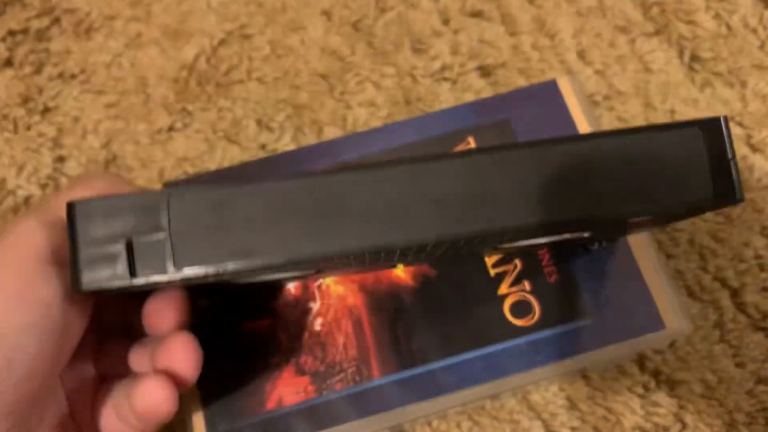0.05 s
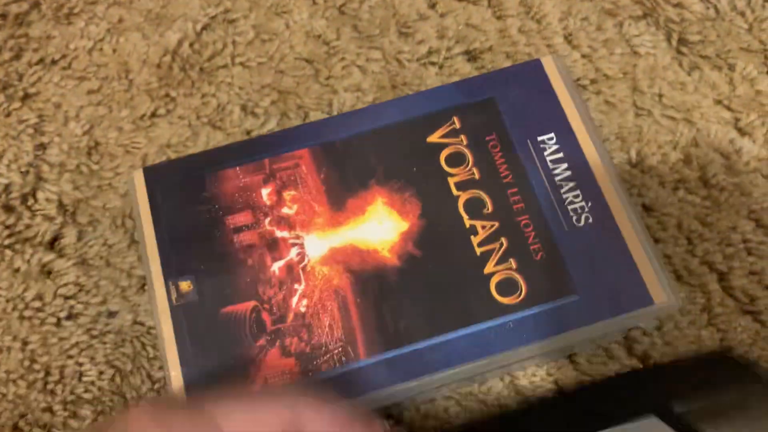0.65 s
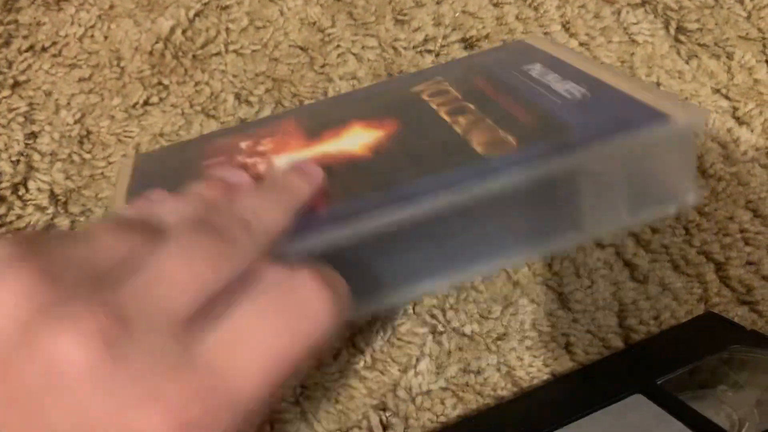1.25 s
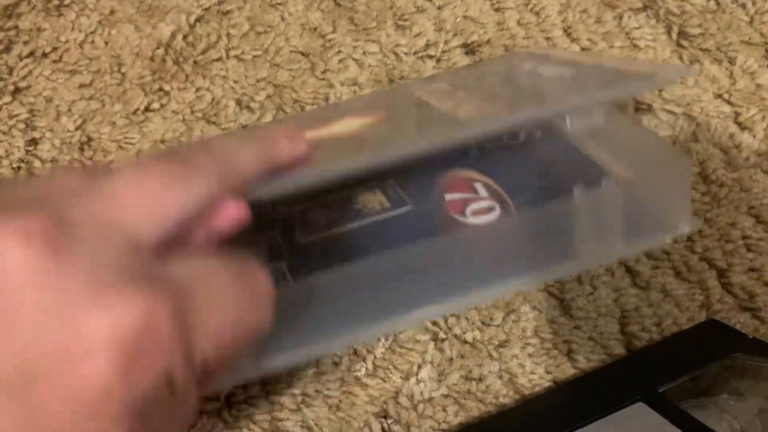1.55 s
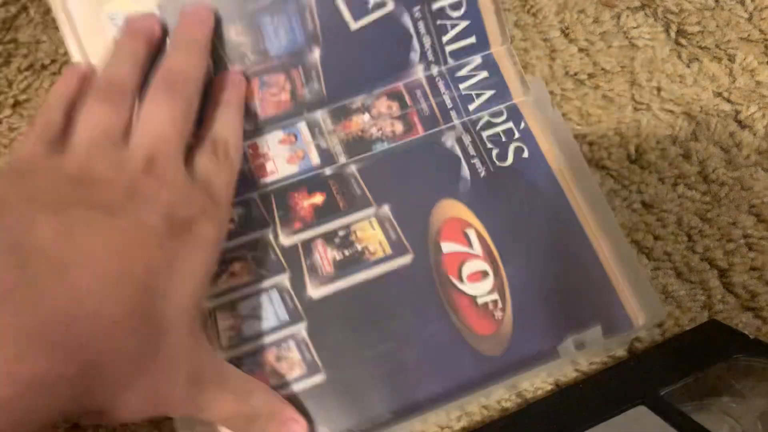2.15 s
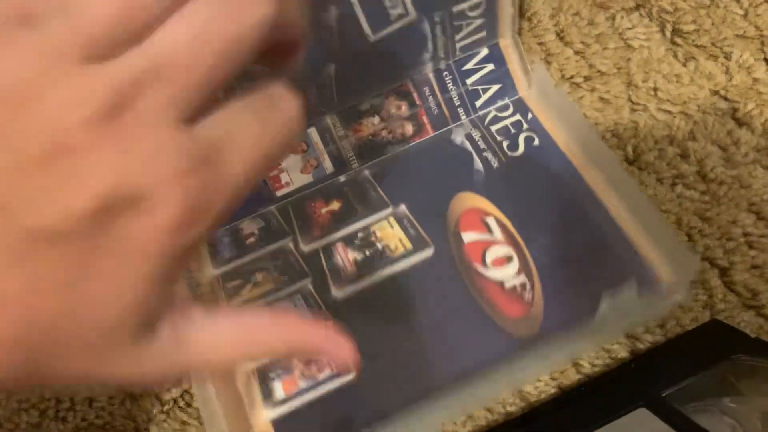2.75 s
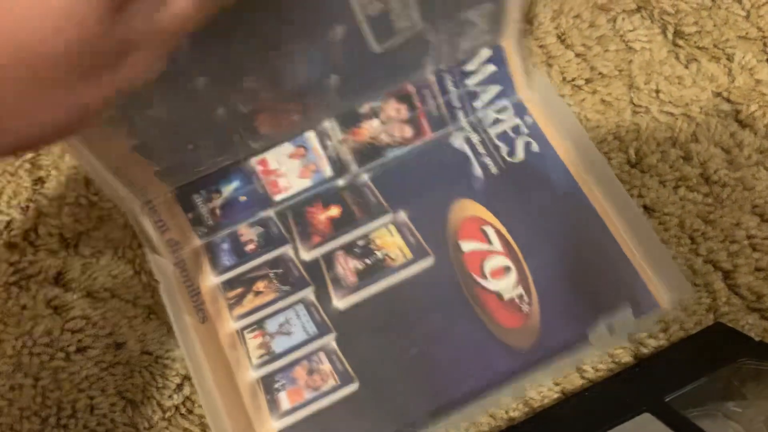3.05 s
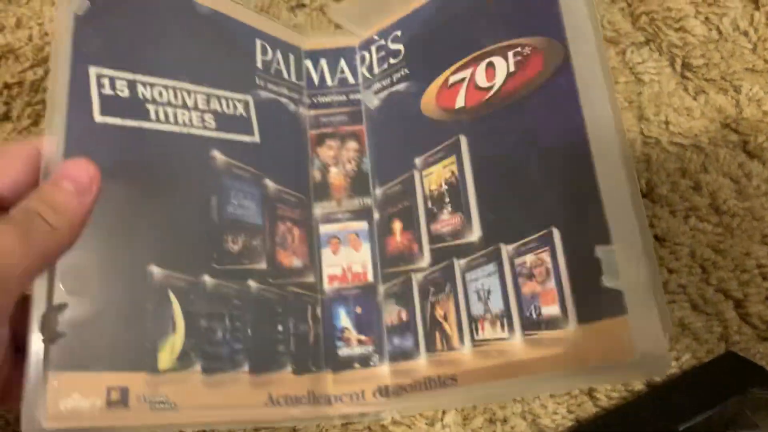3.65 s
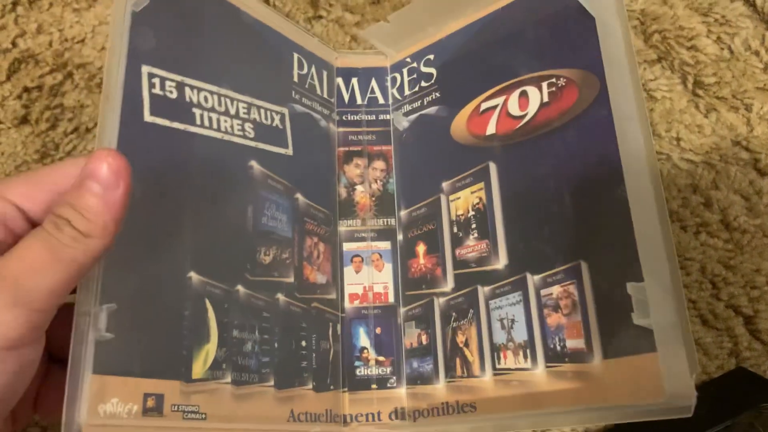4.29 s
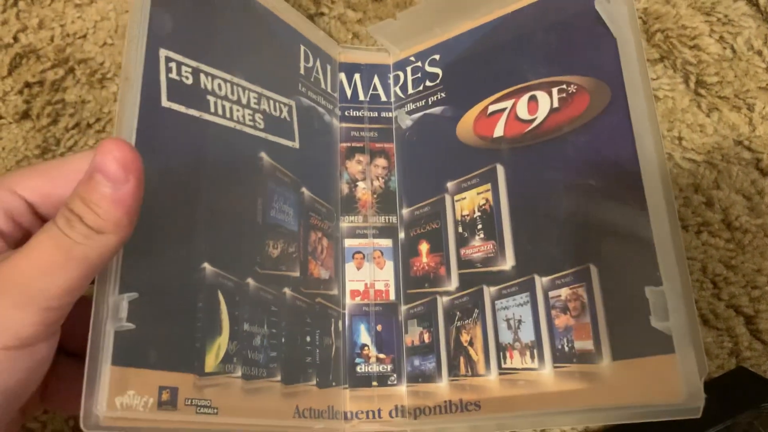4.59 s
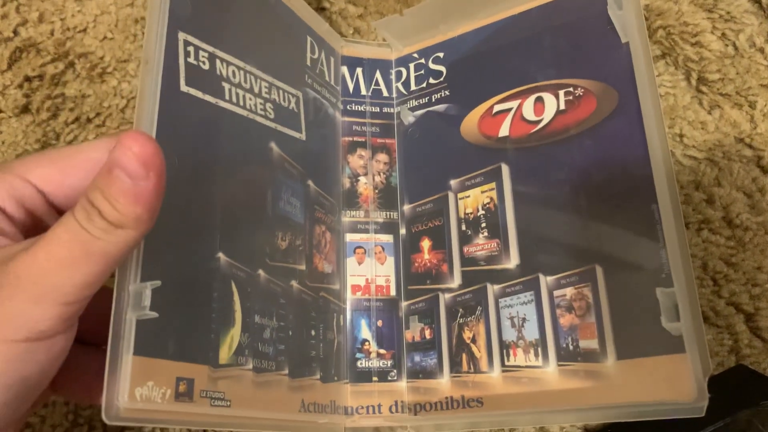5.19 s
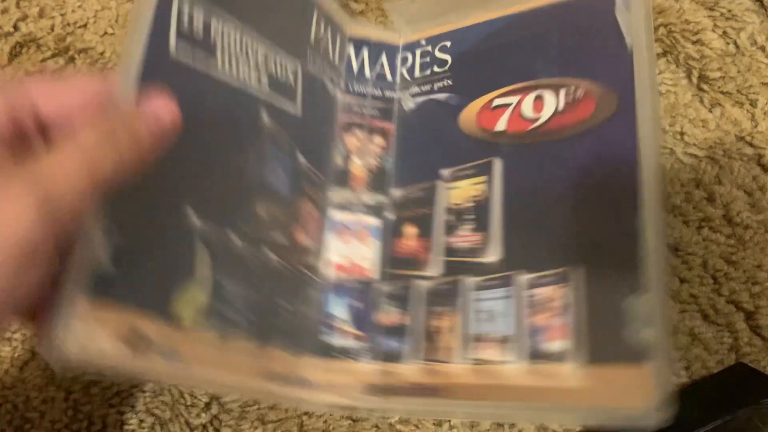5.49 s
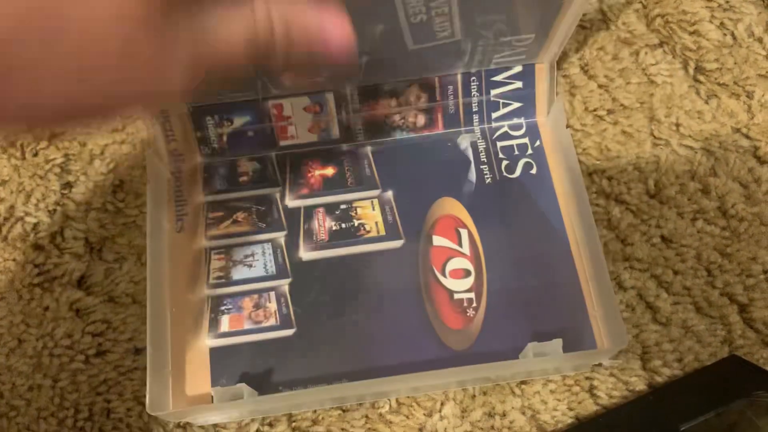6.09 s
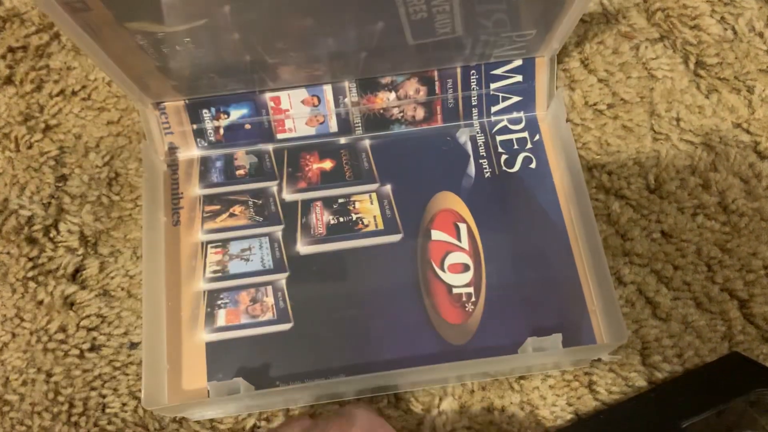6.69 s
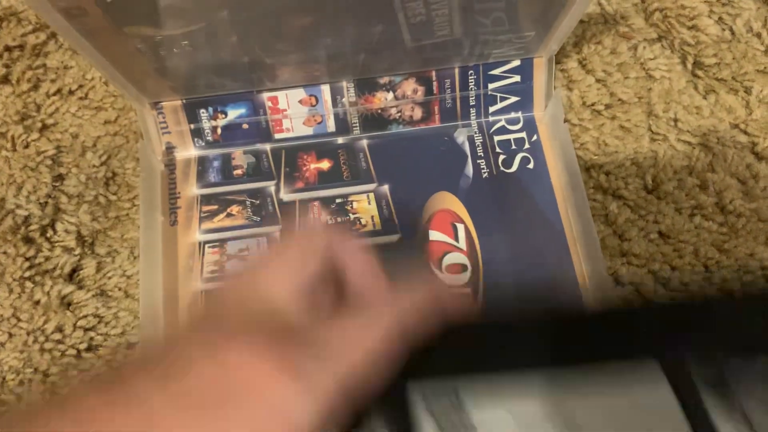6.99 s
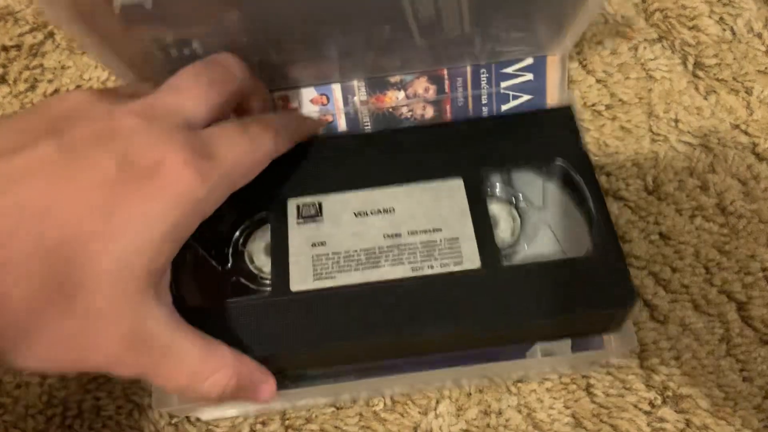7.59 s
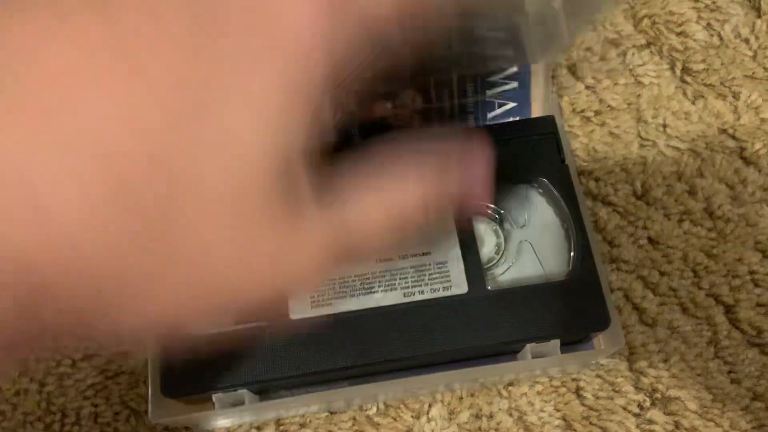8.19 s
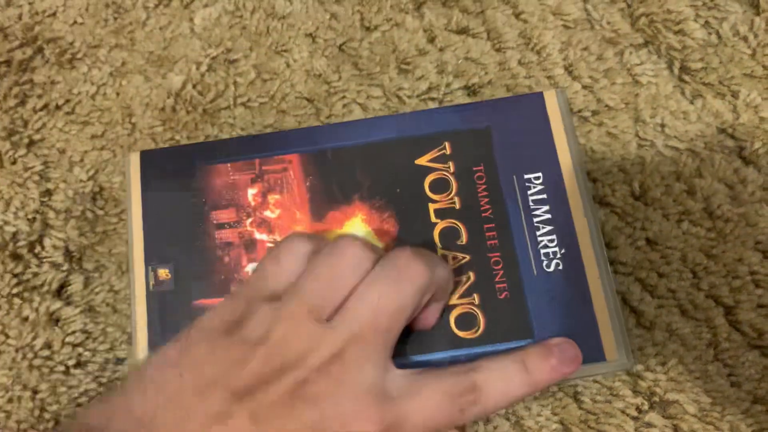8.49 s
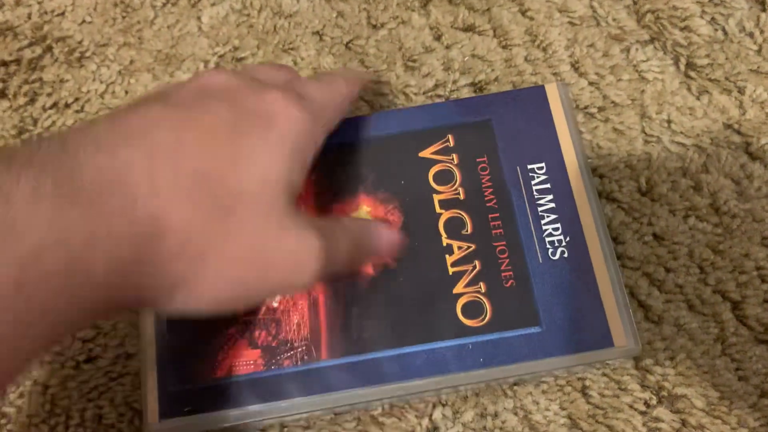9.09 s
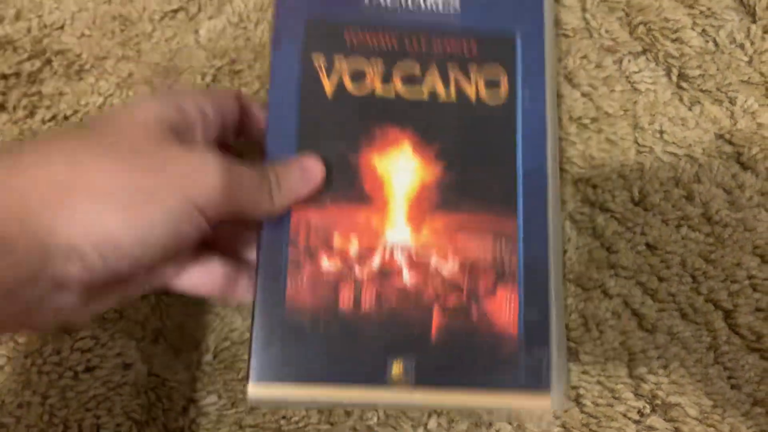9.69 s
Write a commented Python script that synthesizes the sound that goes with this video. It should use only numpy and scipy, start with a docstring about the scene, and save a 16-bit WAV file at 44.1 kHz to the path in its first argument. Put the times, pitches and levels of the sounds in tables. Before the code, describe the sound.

In a quiet, dry room, a close hand-held microphone rumbles faintly as a cassette lands rattling on carpet. A plastic case pops open with small clicks, creaks and finger rubbing, followed by a quieter stretch of dull flexing thumps. Then comes the loudest part, a run of sharp clacks as the cassette is knocked into place. The lid snaps closed and the case is picked up with light bumps.

```python
"""A small, dead, quiet room. Close by, a tape cassette drops on the carpet; its hollow plastic case is
prised open, lifted and put down. The cassette is knocked and pressed in, the lid snaps shut, the case
is picked up. Each blow is an impulse plus chatter ringing the shell modes. Fingers and carpet rub in
grainy strokes; taps and flexing give falling thumps. A hand-held microphone rumbles over faint hiss."""
import sys
import numpy as np
from scipy import signal
from scipy.fft import rfft, irfft, next_fast_len
from scipy.io import wavfile
from scipy.ndimage import uniform_filter1d, map_coordinates

SR = 44100
rng = np.random.default_rng(int(sys.argv[2]) if len(sys.argv) > 2 else 0)


def generate_wav(signal):
    """Clip the signal to [-1, 1] and save it as 16-bit WAV at the path in sys.argv[1]."""
    frames = np.transpose(np.atleast_2d(signal))
    scaled = np.clip(frames, -1, 1) * 32767
    pcm = np.round(scaled).astype(np.int16)
    wavfile.write(sys.argv[1], SR, pcm)


N = 434385

# hand sway: (time [s], relative level [dB])
SWAY = [(0.0, -66), (0.6, -61.5), (0.79, -71), (2.14, -58.5), (2.36, -67.5), (3.51, -58), (4.61, -66.5),
        (7.24, -63.5), (7.73, -56), (7.98, -60), (8.59, -58), (8.78, -65.5), (9.33, -61.5), (9.85, -63.5)]
# noise spectra: (frequency [Hz], relative density [dB])
RUMBLE_SPECTRUM = [(20, -15.5), (35, -15.5), (54, -1.5), (70, -5), (100, -14.5), (160, -26.5), (300, -44.5),
                   (600, -86)]
AIR_SPECTRUM = [(35, -29.5), (60, -2.5), (81, -10), (172, -21.5), (281, -27.5), (566, -31), (1140, -39.5),
                (6900, -44.5), (8510, -55), (11000, -43), (16000, -58)]
# blows: (time [s], rattle [ms], relative level [dB], hardness [dB], weight [dB], contact mode [Hz])
DROP_BLOWS = [(.34, 3.9, -51, -2.5, 3.5, 380), (.418, 11, -43.5, 0, -3, 760), (.464, 2.2, -30, 2, 7, 460),
              (.495, 1.5, -24, 5.5, 1.5, 310), (.508, 8.2, -30.5, 0.5, 1, 310),
              (.526, 9.4, -34.5, -2, 5.5, 460), (.616, 6, -27, -2.5, 4, 500),
              (.642, 3.2, -29, -3, -2.5, 440), (.676, 6, -44, -2, 10.5, 311),
              (.69, 1.2, -30.5, -12.5, -2.5, 2180)]  # cassette lands, reels rattle
CLOSED_BLOWS = [(.001, 4.3, -48, -3, 16, 475), (1.018, 1.2, -73, 18, 16, 451),
                (1.04, 0.89, -76, 20.5, 32, 445), (1.208, 2.5, -67, 5.5, 17.5, 348),
                (1.399, 13, -33, 3, 1.5, 2960), (1.416, 7.7, -35, 7.5, 2, 755),
                (8.366, 8.7, -26.5, -4.5, -3.5, 332), (8.379, 3.1, -32, -8, 9, 318),
                (8.464, 7.3, -51, -0.5, 14, 440), (8.4752, 1.8, -23, 8.5, 2, 456),
                (8.497, .8, -33, 13, -3, 656), (8.758, 3.6, -67.5, 24, 4.5, 1395),
                (8.775, 0.39, -58, 16, -10, 359), (9.183, 3.9, -64.5, -2, 16.5, 438),
                (9.266, .4, -58.5, -10, 4, 4220), (9.293, 9, -52.5, 2.5, 4, 402),
                (9.328, 11.4, -53, 5.5, 11, 334), (9.354, 3.2, -44, -5, 12, 408),
                (9.42, 6, -65, -4, 19, 300), (9.489, 6.1, -62.5, -8.5, 19.5, 280),
                (9.738, 4.2, -67.5, -6.5, 25.5, 290.6)]  # lid and catches
OPEN_BLOWS = [(1.681, 3.2, -47.5, 4, -3, 1820), (1.729, 7, -38, 4.5, -14, 2660),
              (1.747, 2.9, -41.5, 0.5, -10.5, 1760), (1.874, 2.1, -55.5, 0, 3, 1820),
              (1.909, 10.4, -44.5, 7, -8, 1820), (2.006, .5, -32, 2, 7, 3700),
              (2.129, .4, -63.5, -34, 17.5, 430), (2.514, 0.97, -56, -9, -5, 2600),
              (2.675, 2.4, -53.5, 0.5, -4.5, 2480), (2.839, 2.4, -50, -12, 9, 780),
              (2.848, 3, -48, -16, 5, 800), (2.875, 1.7, -50, -15, -3, 1287),
              (3.098, 3.9, -61.5, -18, -13, 810), (3.136, 1.87, -66.5, -0.5, -5, 1310),
              (5.472, 0.54, -68.5, -6, 15, 572), (5.977, 1.37, -69.5, 11.5, -2.5, 758),
              (6.025, 2.5, -61, 10, 1, 780), (6.408, 11, -39, -3, 4, 2900),
              (6.878, 4.6, -47.5, 16.5, -2, 534), (6.983, 5.2, -54, -4, -17, 4080),
              (8.178, 3, -44, 4, 13, 802), (8.198, 2.8, -46, -6, 2, 2930), (8.231, 1, -70.5, 15.5, 5, 814),
              (8.345, 2.3, -46, -10, -4, 1170)]  # taps and hinge creaks
TRAY_BLOWS = [(7.149, 10, -48, -4, 0.5, 520), (7.2178, 3, -16.5, -6.5, -4, 2900),
              (7.256, 2, -15.5, -7, -6.5, 1220), (7.2685, 11.4, -16, 5.5, 0, 1240),
              (7.282, 11.3, -28, 9, -3.5, 610), (7.289, .8, -24.5, 1.5, 4.5, 330),
              (7.451, 7.5, -37.5, -1.5, -2.5, 650), (7.546, 4.9, -39, -11, 8.5, 1530),
              (7.558, 8.2, -33.5, -14.5, 13.5, 370), (7.586, 2.7, -36, -15.5, -1, 370),
              (7.595, 4.7, -35, -4.5, 12, 350), (7.606, 3, -34.5, 9.5, 8, 2220),
              (7.623, 8.6, -34, 12.5, -7.5, 1070), (7.636, 7.7, -22.5, -3, -20, 2250),
              (7.644, 5.6, -20, 6.5, -2, 2250), (7.654, 6, -26.5, -5, -9, 777),
              (7.679, 3.6, -34, 2, -1.5, 1319), (7.769, 21, -52, 3, 15.5, 1750),
              (7.8045, 3.3, -24, -4, -8.5, 2600), (7.811, 2.5, -24.5, 3, 1.5, 2650),
              (7.823, 7.3, -34.5, -9, 6, 2840), (7.942, 2.4, -25, 6.5, -2, 500)]  # cassette hits the tray, is pressed home
# shell resonances (+) and dips (-): (frequency [Hz], width [Hz], gain [dB])
CASSETTE_MODES = [(312, 35, 6), (473, 55, 13), (940, 83, -8), (1150, 84, 4.5), (1520, 60, 2.5),
                  (2230, 70, 8.5), (3380, 100, 5)]
CLOSED_MODES = [(141, 82, 8), (312, 37, 7), (442, 96, 10), (633, 37, 0), (1080, 70, 5), (1314, 75, 7),
                (2335, 45, 5.5), (2870, 24, 6.5), (4024, 130, 2)]
OPEN_MODES = [(137.2, 140, 11), (333, 26, 2), (534, 170, -4.5), (686, 58, 7), (789, 72, 12.5),
              (1020, 79, -3.5), (1292, 160, 13), (1790, 80, 5), (2506, 120, 7), (4200, 280, 4)]
TRAY_MODES = [(167, 64, 7.5), (338, 81, 3.5), (552, 98, 9), (708, 73, 3), (905, 80, 0), (1171, 290, 4.5),
              (1310, 34, 6.5), (2150, 98, 3.5), (2660, 78, 4), (3720, 28, 6), (4440, 140, 8),
              (6390, 91, 9.5), (7500, 70, 9)]  # cassette in its tray
# thud, knock, clack, snap, tick: (low [Hz], high [Hz], base t60 [s], stereo spread [0-1])
REGISTERS = [(94.2, 240, 0.11, 0), (243, 600, 0.016, .08), (674, 2140, 0.046, 0.5), (2300, 6300, 0.062, 1),
             (6800, 14000, 0.018, 0)]
# tone of a plain blow: (gain [dB]) per register
CASSETTE_TONE = [-11, 3, -2, -1, -5]
CLOSED_TONE = [-8, 1.5, -1, -8.5, -8]
OPEN_TONE = [-2.5, -0.5, -2, -3.5, -5.5]
TRAY_TONE = [-10.5, -2, 0.5, -1.5, -2.5]
# a hard edge adds treble, a heavy push bass: (slope [dB/dB]) per register
HARDNESS_SLOPE = [0, 0, -.25, 0.088, 1]
WEIGHT_SLOPE = [1, 0.7, 0.082, 0, 0.21]
# rubbing: (start [s], end [s], relative level [dB], brightness [dB])
STROKES = [(.335, 0.414, -63, -4), (.408, 0.477, -48.5, 0.5), (.479, 0.53, -35, 0),
           (.548, 0.629, -50, -2.5), (.608, 0.703, -40, -1), (.705, .78, -58, -10),
           (1.014, 1.256, -75, -2.5), (1.242, 1.403, -88.5, -20.5), (1.437, 1.531, -68.5, 12),
           (1.701, 1.75, -53.5, 4), (1.755, 2.0, -68, -3), (1.812, 1.848, -58, -5.5),
           (1.9, 1.958, -51, 3.5), (2.075, 2.246, -64, 1), (2.507, 2.684, -71, -2), (3.009, 3.356, -80, 3),
           (3.538, 3.774, -77.5, 3.5), (5.811, 5.957, -73, 6), (6.414, 6.519, -60, -1.5),
           (6.66, 6.764, -71, -5.5), (6.76, 6.967, -61.5, 1.5), (7.155, 7.206, -62.5, -3),
           (7.31, 7.412, -57, 5.5), (7.419, 7.53, -65, -5), (7.555, 7.701, -42, 4), (7.7, 7.826, -58.5, 3),
           (7.828, 7.924, -54, 4.5), (8.21, 8.354, -74, -8), (8.393, 8.563, -64, 3.5),
           (8.698, 8.79, -70.5, 13), (8.955, 9.08, -82, 8), (9.165, 9.28, -75, 0.5),
           (9.274, 9.472, -68, -1), (9.454, 9.6, -80.5, -1)]
# soft pushes: (time [s], relative level [dB])
FINGER_TAPS = [(1.024, -44), (1.042, -39.5), (1.079, -36.5), (1.35, -49.5), (1.369, -51), (1.399, -27.5),
               (2.007, -21)]  # fingertips and lid pops
CASE_FLEXES = [(1.414, -34), (2.842, -38), (3.316, -45), (3.404, -36), (3.436, -39.5), (3.494, -44.5),
               (3.752, -36.5), (4.097, -61.5), (4.219, -58.5), (4.562, -49), (5.527, -34), (5.762, -48)]  # case bends in the hand
# room decay: (frequency [Hz], t60 [s])
ROOM_DECAY = [(150, 0.15), (700, 0.092), (2500, 0.16), (6000, 0.058), (15000, 0.037)]
# microphone ports, extra lag of left behind right: (frequency [Hz], phase [rad])
PORT_PHASE = [(120, 0), (260, -.7), (500, -1.6), (1000, -2.6), (2000, -4.3), (3500, -4.4), (6000, -1.8),
              (15000, -1.9)]
# microphone ports, left over right: (frequency [Hz], gain [dB])
PORT_TILT = [(150, 1), (300, 2), (500, -4.5), (1100, 1.5), (2000, 2), (4500, -5), (8000, 0.2),
             (15000, 0.36)]
# microphone response: (frequency [Hz], gain [dB])
MIC_RESPONSE = [(3000, 0), (4100, 0.5), (5300, -3.5), (7000, -0.5), (8500, -1.5), (10500, 1.5), (13000, -2),
                (15500, -1.5)]

TOP_HZ = 16300


def amp(db):
    """Decibels to gain."""
    return 10 ** (np.asarray(db) / 20)


def unit(x):
    """Scale to rms 1."""
    return x / np.sqrt(np.mean(x ** 2) + 1e-20)


def along(points, hz):
    """Interpolate (frequency [Hz], value) on a log axis."""
    knots_hz, values = np.transpose(points)
    return np.interp(np.log(hz + 1), np.log(knots_hz + 1), values)


def wobble(rate_hz):
    """Smooth curve through random knots."""
    knots = rng.standard_normal(int(N * rate_hz / SR) + 4)
    return map_coordinates(knots, [np.arange(N) * rate_hz / SR])


def filtered(x, response):
    """Apply a complex frequency response."""
    n = x.shape[-1]
    size = next_fast_len(n + SR // 20)
    return irfft(rfft(x, size) * response(np.fft.rfftfreq(size, 1 / SR)), size)[..., :n]


def band(x, lo_hz, hi_hz):
    """Causal band-pass: low bands lag, as bending waves do."""
    sos = signal.butter(3, [lo_hz, min(hi_hz, TOP_HZ)], "band", fs=SR, output="sos")
    return signal.sosfilt(sos, x)


def stereo_noise(n, spread):
    """White noise; spread is the power share uncorrelated between channels."""
    noise = rng.standard_normal((3, n))
    return np.sqrt(1 - spread) * noise[0] + np.sqrt(spread) * noise[1:]


def add(track, time_s, sound):
    """Mix in a stereo sound."""
    start = round(time_s * SR)
    sound = sound[:, max(-start, 0):]
    start = max(start, 0)
    track[:, start:start + sound.shape[1]] += sound[:, :max(N - start, 0)]


def hand_rumble(near, shake_db=-17, settle_s=.05, lump_db=4.5, steady_db=-70):
    """The hand-held microphone sways; knocks shake it in step with their bass."""
    pole = np.exp(-1 / (settle_s * SR))
    bass_power = signal.lfilter([1 - pole], [1, -pole], band(near.mean(0), 80, 310) ** 2)
    shake = amp(shake_db) * np.sqrt(np.abs(bass_power))
    rumble = unit(filtered(stereo_noise(N, spread=.021), lambda hz: amp(along(RUMBLE_SPECTRUM, hz))))
    sway_db = np.interp(np.arange(N) / SR, *np.transpose(SWAY)) - .5
    sway = amp(sway_db) * unit(amp(lump_db * wobble(25)))
    return rumble * np.sqrt(sway ** 2 + shake ** 2 + amp(steady_db) ** 2)


def room_air(level_db=-80.5):
    """Faint hiss of a still room."""
    air = filtered(stereo_noise(N, spread=.68), lambda hz: amp(along(AIR_SPECTRUM, hz)))
    return amp(level_db) * air / np.std(band(air, 400, 16000))


def touch_modes(depth_db, width_ratio=.081, lo_hz=1100, hi_hz=13000, count=14):
    """Each contact point favours some high shell modes and misses others."""
    hz = lo_hz * (hi_hz / lo_hz) ** ((np.arange(count) + rng.random(count)) / count)
    lift_db = np.clip(rng.normal(0, depth_db, count), -12, 7)  # soft plastic never rings out
    return list(zip(hz, width_ratio * hz, lift_db))


def shell(x, modes):
    """The plastic shell filters x through its resonances and dips."""
    def response(hz):
        gain = 1
        for mode_hz, width_hz, db in modes:
            damping = 1j * hz * width_hz
            peak = 1 + (amp(abs(db)) - 1) * damping / (mode_hz ** 2 - hz ** 2 + damping)
            gain = gain * (peak if db > 0 else 1 / peak)
        return gain
    return filtered(x, response)


def blows(table, modes, tone_db, t60_scale, strike_db, gain_db, colour_db, loss_db):
    """Plastic is struck: impulse, chatter of touching parts, two fading rebounds, shell decay."""
    rebound_s = .01
    lead_in_s, lead_in_db = .0063, -22  # faint noise swelling just before each hit
    spot_db, spot_width_ratio, spot_register_db = 8, .15, 2  # lift around the contact mode
    lead, energy_window = SR // 80, SR / 100
    track = np.zeros((2, N))
    t = (np.arange(SR // 7) - lead) / SR
    bounce = np.clip(t // rebound_s, 0, 2)
    for time_s, rattle_ms, level_db, hard_db, weight_db, spot_hz in table:
        rattle_s = rattle_ms / 1000
        rise = np.clip(t / (.37 * rattle_s + 1e-9), 0, 1)
        lead_in = amp(lead_in_db) * np.exp(-np.abs(t) / (lead_in_s + rattle_s / 2))
        grit = np.exp(.5 * unit(uniform_filter1d(rng.standard_normal(len(t)), size=40)))
        chatter = (rise + lead_in) * grit
        drive = np.zeros((len(REGISTERS), 2, len(t)))
        for i, (_, _, t60_s, spread) in enumerate(REGISTERS):
            decay_db_per_s = -60 / (t60_s * t60_scale)
            first_db = decay_db_per_s * np.maximum(t - rattle_s, 0)
            rebound_db = decay_db_per_s * np.maximum(t - rebound_s * bounce - rattle_s, 0)
            fade = amp(np.maximum(first_db, rebound_db - loss_db * bounce))
            drive[i] = stereo_noise(len(t), spread) * chatter * fade
        drive[:, :, lead] += amp(strike_db) / (1 + rattle_ms ** 2 / 2)  # clean hits strike hardest
        excited = modes + touch_modes(colour_db) + [(spot_hz, spot_width_ratio * spot_hz, spot_db)]
        tilt_db = hard_db * np.array(HARDNESS_SLOPE) + weight_db * np.array(WEIGHT_SLOPE)
        levels_db = level_db + gain_db + np.array(tone_db) + tilt_db
        for ringing, (lo_hz, hi_hz, _, _), db in zip(shell(drive, excited), REGISTERS, levels_db):
            nearness = np.exp(-2 * np.log(spot_hz / np.sqrt(lo_hz * hi_hz)) ** 2)
            gain = amp(db + spot_register_db * (nearness - .35)) * np.sqrt(energy_window / len(t))
            add(track, time_s - lead / SR, gain * unit(band(ringing, lo_hz, hi_hz)))
    return track


def rubbing(overhang_s=.016, slip_db=2, catch_db=11, catch_rate_hz=22, catch_s=.0015, open_s=(1.5, 6.6)):
    """Skin and carpet pile slide and catch on plastic; each stroke swells and fades in grainy spurts."""
    track = np.zeros((2, N))
    onsets = (rng.random(N) < catch_rate_hz / SR) * 1.
    catches = signal.lfilter([1], [1, -np.exp(-1 / (catch_s * SR))], onsets)
    grit = np.exp(.5 * wobble(3000))
    slip = amp(slip_db * unit(wobble(35) + wobble(220)))
    grains = grit * slip * (1 + amp(catch_db) * catches)
    # body, rasp, hiss: (low [Hz], high [Hz], stereo spread [0-1], gain [dB], brightness slope [dB/dB])
    layers = [(254, 720, .054, -1.5, -.9), (780, 5800, .45, 0, 0), (7200, 16000, .1, -5, 1.1)]
    for start_s, end_s, level_db, bright_db in STROKES:
        spurts = grains[int((start_s - overhang_s) * SR):int((end_s + overhang_s) * SR)]
        pressure = np.abs(np.sin(np.linspace(0, np.pi, len(spurts)))) ** .9
        case_modes = OPEN_MODES if open_s[0] < start_s < open_s[1] else CLOSED_MODES
        hand_damped = [(hz, width_hz, db / 2) for hz, width_hz, db in case_modes]
        modes = hand_damped + touch_modes(depth_db=4, width_ratio=.16)
        for lo_hz, hi_hz, spread, layer_db, slope in layers:
            scratch = shell(stereo_noise(len(spurts), spread) * spurts, modes)
            gain = amp(level_db + layer_db + slope * bright_db)
            add(track, start_s - overhang_s, gain * unit(pressure * band(scratch, lo_hz, hi_hz)))
    return track


def thumps(table, start_hz, end_hz, glide_s, t60_s, gain_db, attack_s=.0073):
    """A soft push bends the plastic sheet; higher waves arrive first, so the pitch falls."""
    track = np.zeros((2, N))
    t = np.arange(SR // 4) / SR
    hz = end_hz + (start_hz - end_hz) * np.exp(-t / glide_s)
    envelope = (1 - np.exp(-t / attack_s)) * amp(-60 * t / t60_s)
    thump = np.sin(2 * np.pi * np.cumsum(hz) / SR) * envelope
    for time_s, level_db in table:
        add(track, time_s, amp(level_db + gain_db) * np.array([thump, thump]))
    return track


def mic_ports(x, lag_ms=.21):
    """Sound reaches the right port first; the ports also differ in phase and colour."""
    side = np.array([[.5], [-.5]])

    def response(hz):
        lag_rad = 2 * np.pi * hz * lag_ms / 1000 + along(PORT_PHASE, hz)
        return np.exp(-1j * side * lag_rad) * amp(side * along(PORT_TILT, hz))
    return filtered(x, response)


def room_reverb(x, delay_s=.008):
    """Short tail of a carpeted room, different in each channel."""
    hz, t, spectra = signal.stft(rng.standard_normal((2, SR // 3)), SR, nperseg=256)
    decay = amp(-60 * t / along(ROOM_DECAY, hz)[:, None])
    _, tail = signal.istft(spectra * decay, SR, nperseg=256)
    tail = np.pad(tail / np.linalg.norm(tail[0]), ((0, 0), (int(delay_s * SR), 0)))
    return signal.fftconvolve(x, tail, axes=1)[:, :N]


def scene():
    """Cassette, case and hands, close by in the quiet room."""
    drop = blows(DROP_BLOWS, CASSETTE_MODES, CASSETTE_TONE,
                 t60_scale=1.1, strike_db=27, gain_db=-1.5, colour_db=6, loss_db=24)
    drop *= amp([[-1], [1]])  # slightly right
    closed = blows(CLOSED_BLOWS, CLOSED_MODES, CLOSED_TONE,
                   t60_scale=1, strike_db=26.5, gain_db=-.5, colour_db=0, loss_db=19.5)
    opened = blows(OPEN_BLOWS, OPEN_MODES, OPEN_TONE,
                   t60_scale=.76, strike_db=23.5, gain_db=-1, colour_db=5, loss_db=11.5)
    seating = blows(TRAY_BLOWS, TRAY_MODES, TRAY_TONE,
                    t60_scale=.71, strike_db=24.5, gain_db=-1, colour_db=5, loss_db=23)
    taps = thumps(FINGER_TAPS, start_hz=587, end_hz=197, glide_s=.0113, t60_s=.0347, gain_db=11)
    flexes = thumps(CASE_FLEXES, start_hz=340, end_hz=56, glide_s=.00547, t60_s=.16, gain_db=3)
    near = mic_ports(drop + closed + opened + seating + taps + rubbing())
    return near + amp(-15.5) * room_reverb(near) + flexes + hand_rumble(near) + room_air()


def record(dry):
    """Microphone treble colour, soft ceiling, band limit."""
    ceiling = .93
    coloured = filtered(dry, lambda hz: amp(along(MIC_RESPONSE, hz)))
    limited = coloured / (1 + (coloured / ceiling) ** 8) ** (1 / 8)
    return filtered(limited, lambda hz: 1 / (1 + (hz / TOP_HZ) ** 120))


dry = scene()
out = record(dry)
generate_wav(out)
```